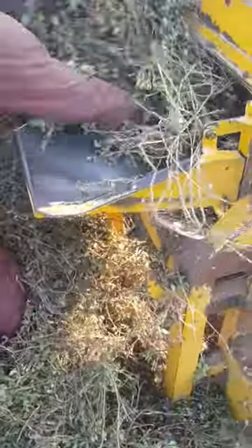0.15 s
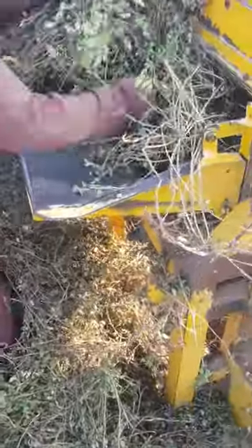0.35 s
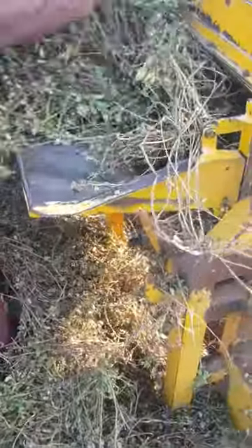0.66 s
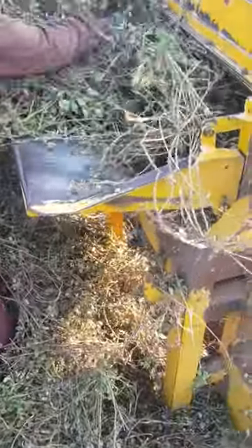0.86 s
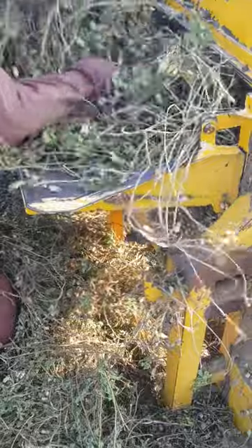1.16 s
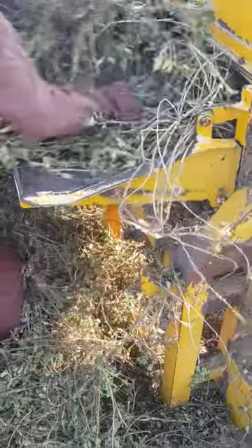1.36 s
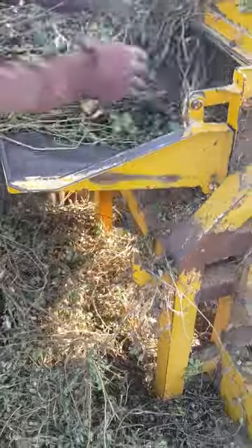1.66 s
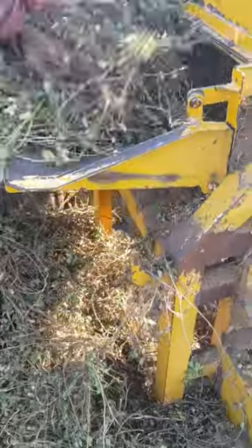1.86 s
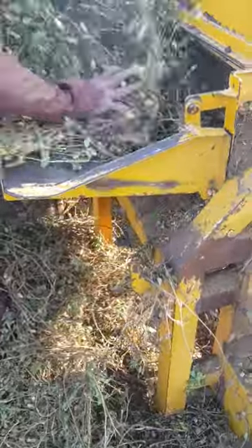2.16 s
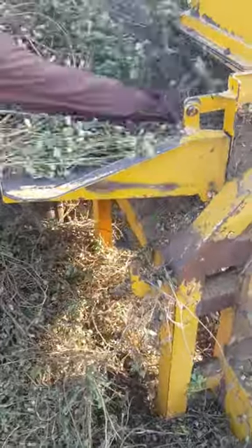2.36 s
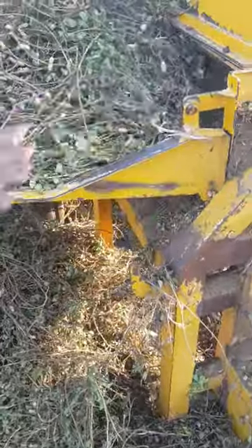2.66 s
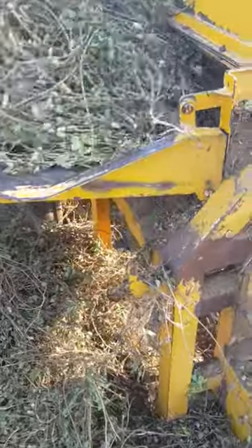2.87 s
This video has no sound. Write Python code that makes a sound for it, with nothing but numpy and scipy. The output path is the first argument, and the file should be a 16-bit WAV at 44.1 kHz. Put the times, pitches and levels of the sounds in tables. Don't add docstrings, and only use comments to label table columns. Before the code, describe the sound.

A peanut thresher roars from start to finish, about 3 seconds, with a wavering blower hum near 93 and 187 Hz over low diesel rumble. The sieve knocks metallically every 0.22 seconds. Dry pods, grit and stems hiss and rattle, denser from about 1.5 seconds. Clods slap the casing irregularly, strongest near 1.64, more often afterward. Close, outdoors, brighter on the right, no fade.

```python
import sys
import numpy as np
from scipy import signal
from scipy.fft import rfft, irfft
from scipy.io import wavfile

SR = 44100
rng = np.random.default_rng(int(sys.argv[2]) if len(sys.argv) > 2 else 0)


def how_loud(loudness_db):
    steps = np.asarray(loudness_db, float) / 20
    return 10 ** steps


def unload_wav(signal):
    wavfile.write(
        sys.argv[1],
        SR,
        np.round(np.clip(np.atleast_2d(signal).T, -1, 1) * 32767).astype(np.int16),
    )


N = 133182


def rms_one(x):
    return x / np.sqrt(np.mean(x ** 2) + 1e-20)


def in_time(rows):
    s, *columns = np.transpose(rows)
    return [np.interp(np.arange(N) / SR, s, column) for column in columns]


def at_hz(points, hz):
    table_hz, value = np.array(points).T
    return np.interp(np.log(hz + 1), np.log(table_hz), value)


def drift(rate):
    r = np.exp(-80 * np.pi * rate / SR)
    white = rng.standard_normal(N // 40 + 2002)
    slow = signal.lfilter([1], [1, -2 * r, r * r], white)[2000:]
    return np.interp(np.arange(N) / 40, np.arange(len(slow)), rms_one(slow))


def colour(x, points):
    return irfft(rfft(x) * how_loud(at_hz(points, np.fft.rfftfreq(N, 1 / SR))), N)


def band(x, low_hz, high_hz):
    edges_hz = [low_hz, min(high_hz, .45 * SR)]
    return signal.sosfilt(signal.butter(2, edges_hz, "band", fs=SR, output="sos"), x)


def ring(clicks, hz, t60):
    r = how_loud(-60 / (t60 * SR))
    w = 2 * np.pi * hz / SR
    return signal.lfilter([0, np.sin(w)], [1, -2 * r * np.cos(w), r * r], clicks + 1e-18)


def ports(mid, side):
    # f/Hz, likeness [0 to 1]
    likeness = [(60, 1), (180, 0.9), (550, 0.74), (1200, 0.15), (2500, 0.21), (5000, 0.07), (15000, 0.09)]
    left_lead_s, lead_from_hz = 0.00039, 1000
    hz = np.fft.rfftfreq(N, 1 / SR)
    alike = np.clip(at_hz(likeness, hz), 0, 1)
    shared = np.sqrt(1 + alike) * rfft(mid)
    apart = np.sqrt(1 - alike) * rfft(side)
    lead = np.exp(2j * np.pi * left_lead_s * np.maximum(hz - lead_from_hz, 0))
    return irfft(np.array([(shared + apart) * lead, shared - apart]) / np.sqrt(2), N)


def patchy(white, shared_db, own_db, rate):
    together = shared_db * (drift(rate) + drift(rate * 3))
    edges = 20 * 2 ** np.arange(0, 10, .5)
    out = 0
    for k, (low, high) in enumerate(zip(edges, edges[1:])):
        flicker = how_loud(together + own_db * drift(2 * rate))
        out = out + flicker * band(white[k % 2], low, high)
    return out


def engine():
    # f/Hz, width/Hz, level/dB
    orders = [(59.35, 1.6, -29), (71.6, 4.1, -30), (110.9, 7.7, -32), (146.3, 6.2, -31), (165, 6.3, -31),
              (211, 18, -29.5), (244, 29, -28), (341, 54, -27), (475, 22, -35.5), (607, 35, -38)]
    out = 0
    for hz, width, db in orders:
        shake = rng.standard_normal((2, N + SR))
        t60 = 1.4 / width
        boom = ring(ring(shake, hz, t60), hz, t60)[:, SR:]
        out = out + how_loud(db) * rms_one(boom)
    return ports(*out)


def roar():
    # f/Hz, density/dB
    rumble = [(25, -35), (50, -8), (85, -5.5), (130, -15.5), (185, -9), (283, -13), (624, -16.5),
              (728, -23.5)]
    air = patchy(rng.standard_normal((2, 2, N)), shared_db=-0.33, own_db=0.98, rate=3.0)
    spectrum = [*rumble, (2500, -39), (6000, -94)]
    return how_loud(-19.5) * rms_one(ports(*colour(air, spectrum)))


def chaff():
    # t/s, level/dB
    feed = [(0, -37.5), (.2, -39), (.42, -39), (.55, -38.5), (.75, -38.5), (.95, -37.5), (1.15, -37.5),
            (1.27, -39.5), (1.42, -38), (1.5, -36), (1.6, -37), (1.68, -34), (1.74, -37), (2.0, -36.5),
            (2.3, -36.5), (2.56, -38.5), (2.7, -36.5), (3.02, -36)]
    # f/Hz, density/dB
    rattle = [(400, -51), (800, 1), (1000, 3), (1400, -8.5), (2000, -8), (3000, -15.5), (6000, -14),
              (16000, -20)]
    grains_per_s, grain_spread_db, grain_share = 1200, 3, 0.41
    dull_below_hz, dull_follows = 4200, 0.7
    flow_db, = in_time(feed)
    shape = (2, 2, N)
    sizes = how_loud(grain_spread_db * np.minimum(rng.exponential(1, shape), 4))
    sizes = sizes * rng.choice([-1, 1], shape)
    grains = rms_one(sizes * (rng.random(shape) < grains_per_s / SR))
    hiss = rng.standard_normal(shape)
    mix = np.sqrt(grain_share) * grains + np.sqrt(1 - grain_share) * hiss
    flickering = patchy(mix, shared_db=0.67, own_db=1.07, rate=11.0)
    whole = rms_one(ports(*colour(flickering, rattle)))
    dull = colour(whole, [(dull_below_hz / 1.1, 0), (dull_below_hz * 1.6, -30)])
    bright = whole - dull
    held_db = flow_db.mean() + dull_follows * (flow_db - flow_db.mean())
    return how_loud(5.5) * (how_loud(held_db) * dull + how_loud(flow_db) * bright)


def hits(rows, modes, ring_db, hiss_db, tick_db, left_db):
    bounce_s, bounce_loss_db, lead_in_s, scatter_db = 0.0055, 2.5, .004, 3
    grit_t60_s, tick_t60_s, tick_top_db = 0.11, .07, -34
    s, db, bright_db = np.transpose(rows)
    luck = rng.normal(0, 1, (len(s), 6, len(modes), 2))
    bounce = np.arange(6)
    contact_s = s[:, None] - lead_in_s + bounce_s * (bounce + .3 * luck[:, :, 0, 1])
    at = (np.maximum(contact_s, 0) * SR).astype(int)
    each_db = db[:, None] - bounce_loss_db * bounce

    sheet = np.zeros(N + SR)
    for k, (hz, level_db, t60) in enumerate(modes):
        clicks = np.zeros(N + SR)
        click_db = each_db + level_db + ring_db + scatter_db * luck[:, :, k, 0]
        clicks[at] = how_loud(click_db) * np.sign(luck[:, :, k, 1])
        sheet += ring(clicks, hz, t60)
    out = ports(sheet[:N], np.roll(sheet[:N], 90))

    grit = (at, each_db + hiss_db, 1500, 7000, grit_t60_s)
    peak_db = np.minimum(db + bright_db + tick_db + 0.5, tick_top_db)
    tick = (at[:, 1], peak_db, 9000, 16500, tick_t60_s)
    for when, gains_db, low, high, t60 in (grit, tick):
        burst = np.zeros(N)
        burst[when] = how_loud(gains_db)
        fading = signal.lfilter([1], [1, -how_loud(-60 / (t60 * SR))], burst + 1e-18)
        out += ports(*band(rng.standard_normal((2, N)), low, high) * fading)
    return out * how_loud(np.array([[left_db], [0]]))


def casing_slaps():
    # t/s, peak/dB, brightness/dB
    slaps = [(0.1394, -35, -15), (0.2994, -26, -18), (0.3694, -44, -17), (1.1794, -42, -9),
             (1.3994, -30, -11), (1.5094, -34, -8), (1.6352, -16.5, -28), (1.6894, -36, -7),
             (1.8394, -22, -21), (1.8894, -30, -9), (2.2294, -26, -16), (2.3294, -25, -13),
             (2.4794, -24, -8), (2.6594, -28, -9), (2.7841, -25, -25)]
    # f/Hz, level/dB, t60/s
    casing = [(1500, -24, 0.036), (1690, -3, 0.066), (2040, 0.5, 0.048), (2180, 1, 0.045),
              (3500, -7, 0.052), (4650, -5, 0.014), (5080, -0.5, 0.025), (5530, -1, .025), (6000, -1, .015)]
    return hits(slaps, casing, ring_db=-14.5, hiss_db=-13.5, tick_db=8.0, left_db=1.0)


def sieve_knocks():
    # t/s, peak/dB, brightness/dB
    strokes = [(.024, -20, -11), (.236, -26, -13), (.464, -21, -7), (.679, -26, -6), (.892, -22, -8),
               (1.109, -25, -6), (1.323, -19.5, -14), (1.541, -20.5, -6), (1.759, -32, -4),
               (1.974, -23, -9), (2.189, -29, -7), (2.419, -28, -3), (2.639, -30, -7), (2.860, -16.5, -19)]
    # f/Hz, level/dB, t60/s
    sieve = [(1200, -24, 0.023), (1500, 6, .03), (1700, 1, 0.069), (1770, 0, 0.032), (1860, 17, 0.045),
             (2174, -2, 0.055), (2940, -4, 0.04)]
    return hits(strokes, sieve, ring_db=-18, hiss_db=-17.5, tick_db=6.0, left_db=0.5)


def blower():
    # t/s, f/Hz, level/dB
    blade_tone = [(0.0, 188, -15.5), (0.35, 187.9, -22.5), (0.49, 188.5, -13), (0.6, 185.5, -20.5),
                  (0.84, 188.4, -15.5), (1.37, 186.3, -20.5), (1.38, 187.3, -16.5), (1.71, 186.6, -19.5),
                  (1.84, 186.5, -17), (2.05, 186, -21.5), (2.08, 186.1, -18.5), (2.4, 186.4, -17),
                  (2.42, 186.5, -30), (2.46, 186.4, -12), (2.51, 186.4, -17.5), (3.02, 186.6, -18.5)]
    first_db, waver_db, wander_rad, lean_db = -21.5, 1.0, 0.26, 0.1
    hz, second_db = in_time(blade_tone)
    turn = np.pi * np.cumsum(hz) / SR
    first = how_loud(first_db + waver_db * drift(3.0)) * np.sin(turn + wander_rad * drift(6.6))
    second = how_loud(second_db + 0.39 * drift(36.0)) * np.sin(2 * turn + 0.23 * drift(3.4))
    return np.sqrt(2) * (first + second) * how_loud(np.array([[.5], [-.5]]) * lean_db)


def scene():
    background = engine() + roar()
    crop = chaff() + casing_slaps()
    return background + crop + sieve_knocks() + blower()


def top_cut(x):
    return signal.sosfilt(signal.butter(12, 16010, fs=SR, output="sos"), x)


def record(dry):
    # f/Hz, left minus right/dB
    lean = [(60, 0), (200, -3), (380, 0.5), (700, -7.5), (2000, -6)]
    # f/Hz, level/dB
    left_port = [(2000, 0), (3000, 0.5), (6000, -6), (7900, -18), (9300, -1.5), (12000, -1.5), (15700, -8)]
    # f/Hz, level/dB
    right_port = [(2500, -0.5), (2900, 3.5), (3800, 1.5), (5300, 5), (8100, -6.5), (10600, -3), (12000, 4),
                  (15700, 8.5)]
    rumble_cut_hz, top_hz = 35, 15760
    hz = np.fft.rfftfreq(N, 1 / SR)
    lean_db = at_hz(lean, hz) / 2
    gains = how_loud(np.array([at_hz(left_port, hz) + lean_db, at_hz(right_port, hz) - lean_db]))
    heard = irfft(rfft(dry) * gains, N)
    heard = signal.sosfilt(signal.butter(3, rumble_cut_hz, "high", fs=SR, output="sos"), heard)
    rounded = 1.534 * np.tanh(heard / 1.66)
    mix = irfft(rfft(rounded) * (hz < top_hz), N)
    return top_cut(mix)


dry = scene()
out = record(dry)
unload_wav(out)
```